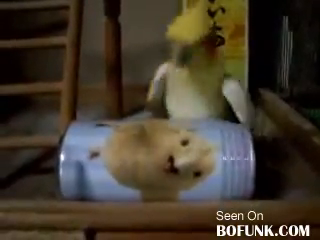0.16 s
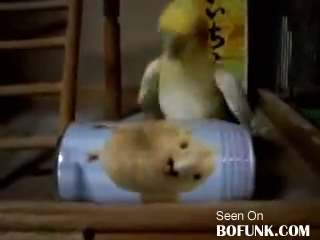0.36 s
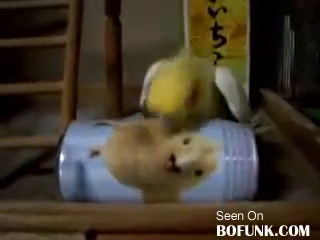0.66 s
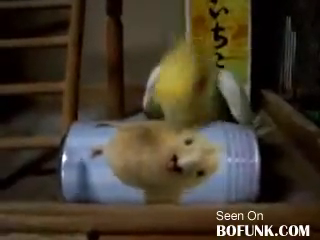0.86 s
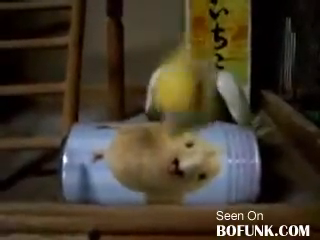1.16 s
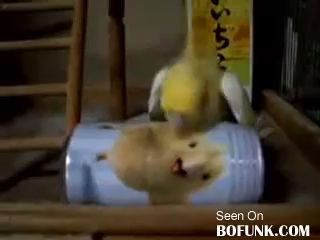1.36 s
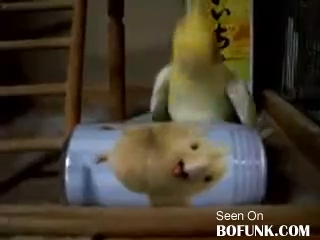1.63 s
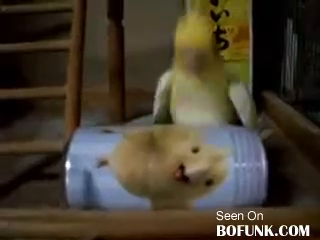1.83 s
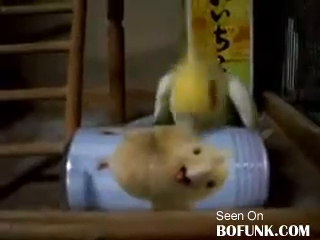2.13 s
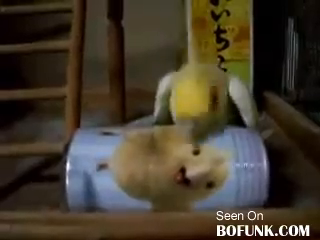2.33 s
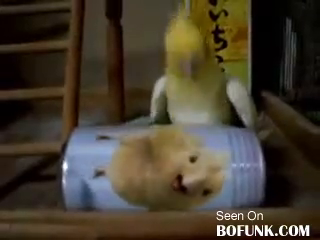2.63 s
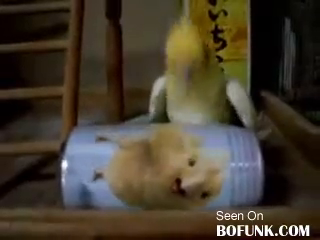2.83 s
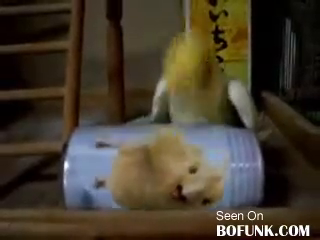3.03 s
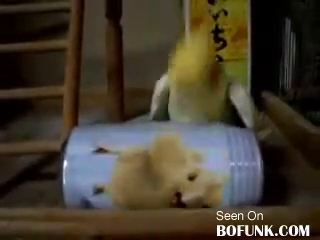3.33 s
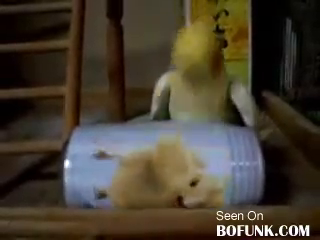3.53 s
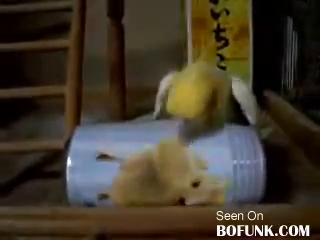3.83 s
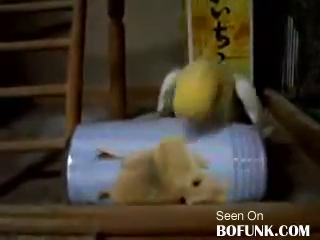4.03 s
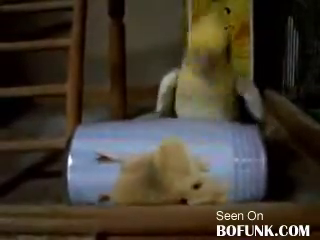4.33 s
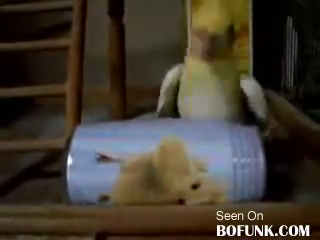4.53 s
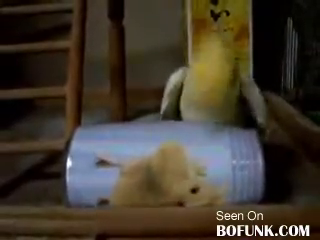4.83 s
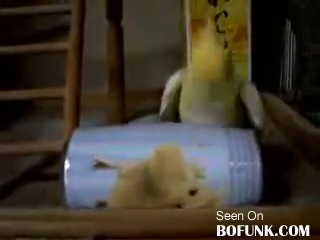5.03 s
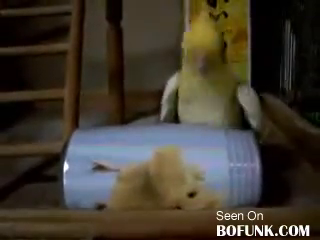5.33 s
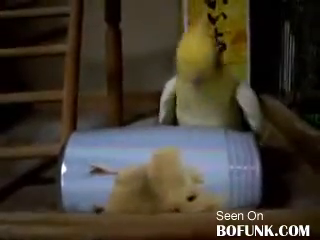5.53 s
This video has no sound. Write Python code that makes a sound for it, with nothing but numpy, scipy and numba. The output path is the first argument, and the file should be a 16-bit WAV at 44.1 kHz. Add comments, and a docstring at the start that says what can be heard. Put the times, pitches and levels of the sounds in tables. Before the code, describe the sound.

Quick, evenly spaced metallic taps run from start to finish as a small bird pecks an empty drink can. The thin wall rings briefly after every hit and the can rattles softly against a wooden seat. Its ring changes colour as it rolls a little, and the last few pecks are drier and sharper. A close, slightly muffled microphone picks up a short room echo and faint background noise.

```python
"""A cockatiel drumming on a can

The bird pecks an empty drink can lying on a wooden chair, about five times a second. Each peck clanks
the thin wall, which rings on; the can then rocks and rumbles on the seat. It also rolls slowly, so the
beak meets other parts of the wall. The room is small; a close, dull microphone turns loud pecks down."""
import sys
import numpy as np
from scipy import signal
from scipy.fft import rfft, irfft
from scipy.io import wavfile
from scipy.ndimage import uniform_filter1d, minimum_filter1d
from numba import njit

SR = 44100
rng = np.random.default_rng(int(sys.argv[2]) if len(sys.argv) > 2 else 0)


def to_wav(sig):
    """Store sig (one row per channel, or 1-D mono) as 16-bit WAV at the path in sys.argv[1].

    Samples outside -1..1 are clipped; the rate is SR.
    """
    pcm = np.clip(np.atleast_2d(sig), -1, 1) * 32767
    pcm = np.round(pcm).astype(np.int16)
    wavfile.write(sys.argv[1], SR, pcm.T)  # frames by channels


N = 250047
T = np.arange(int(.6 * SR)) / SR  # seconds since the start of one short sound

# The tone of the background noise. Each row: frequency in Hz, relative level in dB.
BACKGROUND_TONE = [(25, -8), (60, 8.5), (150, 5.5), (400, 11), (1200, -5.5), (3000, -6.5), (4500, -32)]
# Light touches of beak and feet. Each row: start in seconds, level in dB, middle frequency in Hz.
TICKS = [(0.361, -27, 2710), (0.5836, -38, 2640), (0.9728, -25.5, 2920), (1.534, -26.5, 251),
         (4.7672, -29.5, 2360)]
# The tone of the rim rumbling on wood. Each row: frequency in Hz, relative level in dB.
RUMBLE_TONE = [(30, -25.5), (100, -25), (145, -8), (205, -12), (265, -9.5), (550, 3), (820, -3.5),
               (1100, -2.5), (1600, -1.5), (2100, -6.5), (2600, -8.5), (3300, -13), (4400, -34.5)]
# The notes of can and seat ringing together as the can rocks.
# Each row: pitch in Hz, width in Hz, level over the rumble in dB.
ROCKING_NOTES = [(280, 24, 3), (355, 18, 13), (412, 20, 3), (600, 20, 4), (736, 22, 4), (928, 18, 11),
                 (982, 26, 16), (1143, 12, 12), (1236, 12, 6), (1312, 14, 5), (1720, 40, 4)]
# The tone of the high fizz and spits. Each row: frequency in Hz, relative level in dB.
FIZZ_TONE = [(2000, -19.5), (4800, 4), (5700, -4), (6700, 2), (8000, -12), (10000, -7)]
# Thin, bright spits as a sharp peck overloads the recorder. Each row: start in seconds, strength in dB.
OVERLOAD_SPITS = [(4.204, -52), (4.5935, -46.5), (4.9851, -36), (5.1784, -41.5)]
# The notes of the can's wall. Each row: pitch in Hz, seconds to fade by 60 dB,
# then three relative levels in dB, for a peck on spot 0, 1 and 2 of the wall.
CAN_NOTES = [(354.2, 0.3, -2.5, -1.5, 4), (640.6, 0.17, 7, -11.5, -4), (981, 0.14, -11, -8, 12),
             (1094, 0.11, 11.5, -12.5, -7.5), (1128, 0.76, -13.5, -6.5, -6), (1200, 0.45, -13.5, -4, 5),
             (1305, 0.47, -7, -1.5, -8.5), (1415, 0.39, -24.5, -6.5, 6), (1380, 0.18, -26, -12, -7),
             (1480, 0.39, 1, -8.5, -16.5), (1480, 0.3, -14.5, -6, -5.5), (1794, 0.094, -7.5, -6, -7),
             (1895, 0.036, 4.5, -13.5, -9.5), (2020, 0.032, -6, -4.5, -1.5), (1985, 0.36, 0, -20, -20.5),
             (1940, 0.19, -23, -6.5, -8), (2220, 0.14, -13.5, -23, -21), (2590, 0.2, -15.5, -5.5, -23.5),
             (2681, 0.055, -1, 4.5, -2.5), (2640, 0.12, -1, 0.5, -1.5), (2880, 0.049, -8, -10, -13),
             (3190, 0.12, 6.5, -8, 0), (3356, 0.053, 8, 11, 5.5), (3690, 0.1, -8, 4.5, 7),
             (3900, 0.017, -6.5, -20, 10.5)]
# Where the beak lands as the can rolls. Each row: time in seconds, spot from 0 to 2.
BEAK_PATH = [(0, 0.5), (2.6, 0), (3.25, 1.62), (3.85, 1.26), (4.35, 0.56), (5.6, 2)]
# The can's notes fall into five groups. Each row: lowest pitch in Hz, highest pitch in Hz.
GROUP_RANGES = [(280, 760), (900, 1450), (1480, 2200), (2300, 2920), (3080, 4400)]
# How loud each group is; a hard peck mostly drives the dent under the beak. Each row: level in dB
# before the roll, level in dB after it, dB added per dB of force, dB added per dB of ping.
GROUP_LEVELS = [(-31, -28.5, 0.96, 0), (-20, -20, .5, -0.5), (-19.5, -19, 2.1, 0), (-20, -17.5, 0.2, 0.5),
                (-25, -28, 1.12, 0)]
# The pecks. Each row: start in seconds, force in dB, bite (boost of the first moment) in dB, lower dent
# note in Hz, ping of the upper dent note in dB, wait before rocking in seconds, rocking level in dB.
PECKS = [(0.011, -2, 3, 2010, 4, .041, -22.5), (0.209, 0, 1.5, 2010, 1, 0.041, -24),
         (0.4142, 0, 4.5, 1800, -2.5, 0.023, -31), (0.6144, 0, 8, 1734, -2, 0.035, -36.5),
         (0.8084, 2.5, 8.5, 1677, -4, 0.023, -24), (0.9919, -0.5, 0.5, 1760, -6, 0.039, -23),
         (1.178, 0.2, -0.5, 1804, -1, 0.043, -26.5), (1.368, -1.5, 1.5, 1800, -4, 0.031, -28),
         (1.5544, -1.7, 3, 1730, -3, 0.044, -33), (1.7483, -1, 4.5, 1815, -5.5, 0.03, -27),
         (1.9461, 0, 5.8, 1790, 1.5, 0.029, -22.5), (2.1284, -1.7, 6.5, 1600, 2, 0.041, -25),
         (2.3136, -1.7, 6, 1920, -3.5, .026, -23.5), (2.492, -1.7, 3.5, 1810, -1.5, .026, -24.5),
         (2.681, -0.2, 5, 1860, 0, 0.021, -25), (2.8698, 2, 9.5, 1750, -0.5, 0.028, -26),
         (3.0672, -2, -1.5, 1874, 1, 0.026, -25), (3.2583, -0.5, 0.5, 1820, -1, 0.034, -22),
         (3.4454, 1.1, 2, 2003, 1, 0.032, -25), (3.6342, 1.7, 3, 1660, 0, 0.04, -25.5),
         (3.8209, 0.5, 1.5, 1600, -3, 0.03, -27), (4.0093, 0.9, -4.5, 1670, -3, 0.043, -23),
         (4.205, 1.3, 6, 1590, 5.5, .026, -25), (4.4003, 0.3, 3, 1630, 0, 0.031, -25),
         (4.5958, 1, 0.2, 1645, -2, 0.023, -28), (4.7871, 0.6, 9.5, 1633, 2, 0.022, -50),
         (4.9856, 3.5, 12.5, 1606, 4.5, 0.044, -35), (5.1794, 1.1, 4.5, 1674, -4.5, .022, -38),
         (5.3707, -2, 6.5, 1710, 0, 0.014, -34.5), (5.5599, -1, 4, 1690, -2.5, 0.015, -30)]

FAINT_FIZZ_DB = -59.5  # strength of the faint, high fizz heard on each peck


def gain(db):
    """Turn decibels into a number to multiply by."""
    return 10 ** (np.asarray(db) / 20)


def rms(x):
    """The average strength of a sound (root mean square)."""
    return np.sqrt(np.mean(x ** 2))


def fade(fade_s):
    """A ring dying away: it drops 60 dB in fade_s seconds."""
    return np.exp(-np.log(1000) * T / fade_s)


def add(out, start_s, x):
    """Mix x into out from start_s on."""
    i = max(int(start_s * SR), 0)
    out[i:i + len(x)] += x[:max(len(out) - i, 0)]


def band(x, low_hz, high_hz, order=3):
    """Keep what lies between two frequencies."""
    return signal.sosfilt(signal.butter(order, [low_hz, high_hz], "band", fs=SR, output="sos"), x)


def cut_treble(x, top_hz, order):
    """Keep what lies below top_hz; a higher order cuts more steeply."""
    return signal.sosfilt(signal.butter(order, top_hz, fs=SR, output="sos"), x)


def shape_tone(x, tone):
    """Turn each frequency up or down as a tone table says."""
    hz, db = np.transpose(tone)
    all_hz = np.maximum(np.fft.rfftfreq(len(x), 1 / SR), 1)
    curve_db = np.interp(np.log(all_hz), np.log(hz), db)
    return irfft(rfft(x) * gain(curve_db), len(x))


def background(level_db=-53):
    """A faint, steady, low rush."""
    noise = shape_tone(rng.standard_normal(N), BACKGROUND_TONE)
    return gain(level_db) * noise / rms(noise)


def room_echo(x, low_fade_s=0.42, high_fade_s=0.32, build_s=0.0036):
    """The echoes of a small furnished room, a little shorter in the treble."""
    echoes = rng.standard_normal(len(T)) * (1 - np.exp(-(T / build_s) ** 2))
    tails = echoes * fade(low_fade_s), echoes * fade(high_fade_s)
    low, high = (tail / np.linalg.norm(tail) for tail in tails)
    response = gain(-6) * band(low, 120, 1300, order=1) + gain(-7) * band(high, 1800, 4200, order=1)
    return signal.fftconvolve(x, response)[:N]


def fizz(strength_db, boost_db=5, fade_s=0.034, faint_top_hz=6700, hz_per_db=190):
    """A short, thin hiss: a high fizz when faint, a brighter spit when strong."""
    top_hz = np.clip(faint_top_hz + hz_per_db * (strength_db - FAINT_FIZZ_DB), 6000, 11000)
    hiss = shape_tone(rng.standard_normal(len(T)), FIZZ_TONE)
    hiss = cut_treble(hiss, top_hz, order=10)
    return gain(strength_db + boost_db) * hiss / rms(hiss) * fade(fade_s)


def tick(hz, fade_s=0.044, spread=1.3):
    """A light touch of beak or foot: bright on the metal, dull on the wood."""
    noise = band(rng.standard_normal(len(T)), hz / spread, hz * spread, order=2)
    return noise / rms(noise) * fade(fade_s)


def rolled(time_s, start_s=2.7, length_s=1.4):
    """The can rolls a little way, once: how far it has got, from 0 to 1."""
    return np.clip((time_s - start_s) / length_s, 0, 1)


def rocking(length_s, contacts_per_s=2500, grit=1.26, swell_s=.011):
    """The nudged can rocks on its rim: tiny contacts swell, ring can and seat, then die away."""
    contacts = (rng.random(len(T)) < contacts_per_s / SR) * rng.choice([-1, 1], len(T))
    rattle = contacts / rms(contacts) + grit * rng.standard_normal(len(T))
    swell = 1 - np.exp(-T / swell_s)
    settle = np.exp(-(T / (1.16 * length_s)) ** 1.65)
    rumble = shape_tone(rattle * swell * settle, RUMBLE_TONE)
    ring = sum(gain(db) * signal.lfilter(*signal.iirpeak(hz, hz / width, fs=SR), rumble)
               for hz, width, db in ROCKING_NOTES)
    out = rumble + ring
    low_mid_level = np.sqrt(np.sum(band(out, 250, 900) ** 2) / (length_s * SR))
    return out / low_mid_level


def low_thud(hz=140, fade_s=.022):
    """A short, dull, low thud under each peck."""
    return np.sin(2 * np.pi * hz * T) * fade(fade_s)


def struck_notes(time_s, dent_hz, dent_fade_s=0.069):
    """The notes a peck wakes: those of the wall, plus two brief ones of the dent under the beak."""
    hz, fade_s, *spot_levels = np.transpose(CAN_NOTES)
    spot = np.interp(time_s, *np.transpose(BEAK_PATH))
    # blend the levels of the nearest spots
    wall_db = sum(max(1 - abs(spot - k), 0) * db for k, db in enumerate(spot_levels))
    # no two pecks land on quite the same point
    wall_db = wall_db + 2.1 * rng.standard_normal(len(hz))
    hz = hz * (1 + .009 * rng.standard_normal(len(hz)))
    dent_db = 5 + 6 * spot  # the dent rings more clearly towards spot 2
    return np.r_[hz, dent_hz], np.r_[fade_s, dent_fade_s, dent_fade_s], np.r_[wall_db, dent_db, dent_db]


def can_clank(time_s, group_db, dent_hz, bite_db, crack_fade_s=0.11, contact_s=0.00054, press_s=0.009):
    """The thin wall rings with clear notes, while a crowd of short ones blurs into a crack."""
    hz, fade_s, note_db = struck_notes(time_s, dent_hz)
    signs = rng.choice([-1, 1], len(hz))
    # a beak that stays pressed on soaks up the ring (high bite); one that skids lets it build (low bite)
    bite = gain(bite_db * np.exp(-(T / press_s) ** 2))
    touch = (1 - np.exp(-T / contact_s)) * bite
    opening = T < .02  # each group's level is set over its first 20 ms
    out = 0
    for (low_hz, high_hz), db in zip(GROUP_RANGES, group_db):
        members = np.flatnonzero((hz >= low_hz) & (hz < high_hz))
        ring = sum(signs[k] * gain(note_db[k]) * fade(fade_s[k]) * np.sin(2 * np.pi * hz[k] * T)
                   for k in members)
        crack = band(rng.standard_normal(len(T)) * fade(crack_fade_s), low_hz, high_hz)
        group = (ring + gain(1) * crack / rms(crack[opening])) * touch
        out = out + gain(db) * group / rms(group[opening])
    return out


def peck(time_s, force_db, bite_db, lower_dent_hz, ping_db):
    """One blow clanks the can, with a low thud; force, ping and roll balance the note groups."""
    before_db, after_db, per_force, per_ping = np.transpose(GROUP_LEVELS)
    roll = rolled(time_s)
    group_db = before_db + (after_db - before_db) * roll + per_force * force_db + per_ping * ping_db
    # the upper dent note rises with the roll and wanders about 3% from peck to peck
    upper_dent_hz = (2602 + 88 * roll) * (1 + .03 * rng.standard_normal())
    clank = can_clank(time_s, group_db, (lower_dent_hz, upper_dent_hz), bite_db)
    thud = gain(group_db[0] - 3) * low_thud()  # follows the lowest group
    return clank + thud


def scene():
    """Mix the pecks, their fizz, the rocking after each, the ticks, the room and its background."""
    knocks, fizzes = np.zeros(N), np.zeros(N)
    for start_s, force_db, bite_db, lower_dent_hz, ping_db, wait_s, rocking_db in PECKS:
        add(knocks, start_s, peck(start_s, force_db, bite_db, lower_dent_hz, ping_db))
        rocking_s = 0.044 + 0.0091 * rolled(start_s)  # a little longer once the can has rolled
        add(knocks, start_s + wait_s, gain(rocking_db) * rocking(rocking_s))
        add(fizzes, start_s, fizz(FAINT_FIZZ_DB))
    for start_s, strength_db in OVERLOAD_SPITS:
        add(fizzes, start_s, fizz(strength_db))
    for start_s, db, hz in TICKS:
        add(knocks, start_s, gain(db) * tick(hz))
    in_room = background() + knocks + room_echo(knocks)
    dull = cut_treble(in_room, top_hz=4300, order=14)  # only the fizz and spits stay bright
    return (dull + fizzes)[None]


@njit
def follow_level(x, rise_s, fall_s):
    """Track how loud x is, rising at one speed and falling at another."""
    out, level = np.empty(len(x)), 0.
    for i in range(len(x)):
        lag_s = rise_s if abs(x[i]) > level else fall_s
        level += (abs(x[i]) - level) / (lag_s * SR)
        out[i] = level
    return out


def record(dry, threshold=0.18, ceiling=.93, top_hz=10100):
    """The microphone's gain control dips after hard pecks, a limiter holds peaks, and the top is cut."""
    level = follow_level(dry[0], rise_s=0.0084, fall_s=0.24)
    turned_down = dry / np.maximum(level / threshold, 1)
    limiter = ceiling / np.maximum(np.abs(turned_down), ceiling)
    # widen and smooth each dip of the limiter so that it does not click
    limiter = minimum_filter1d(limiter, size=81)
    limiter = uniform_filter1d(uniform_filter1d(limiter, size=41), size=41)
    treble_cut = signal.ellip(8, .2, 70, top_hz, fs=SR, output="sos")
    return signal.sosfilt(treble_cut, turned_down * limiter)


dry = scene()
out = record(dry)
to_wav(out)
```